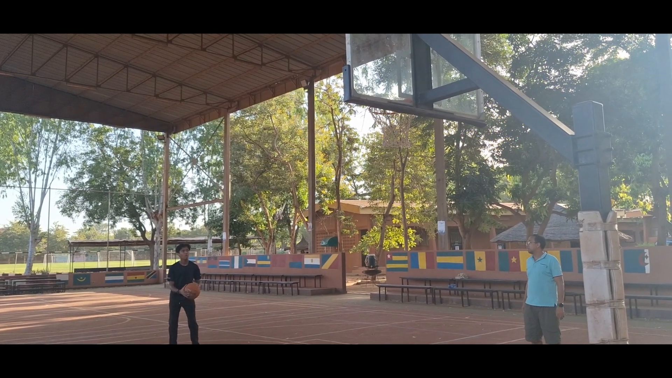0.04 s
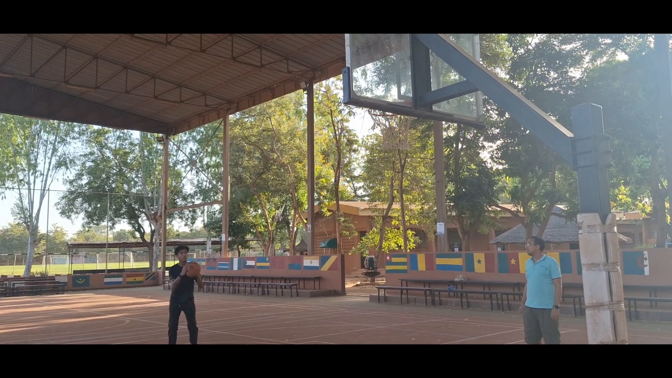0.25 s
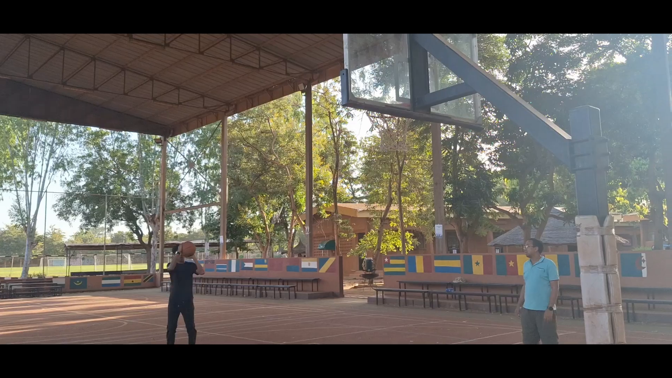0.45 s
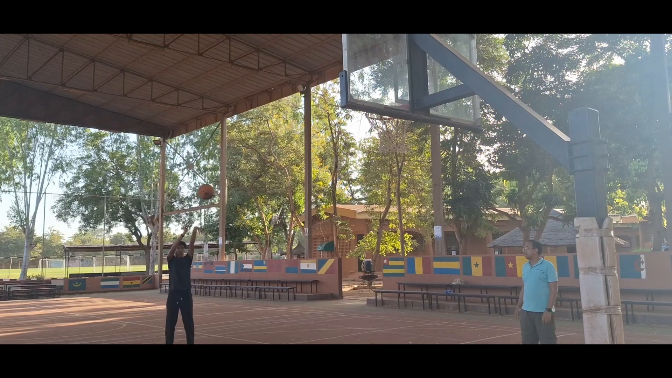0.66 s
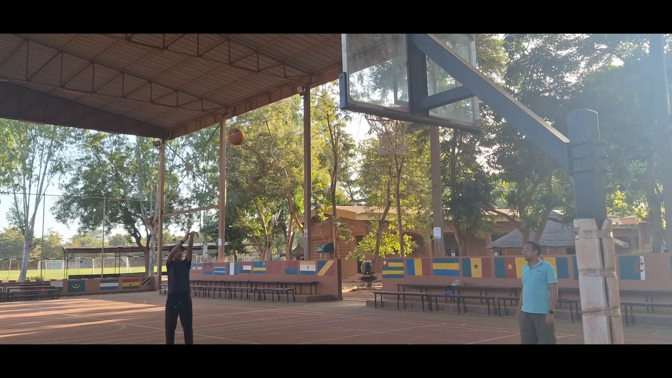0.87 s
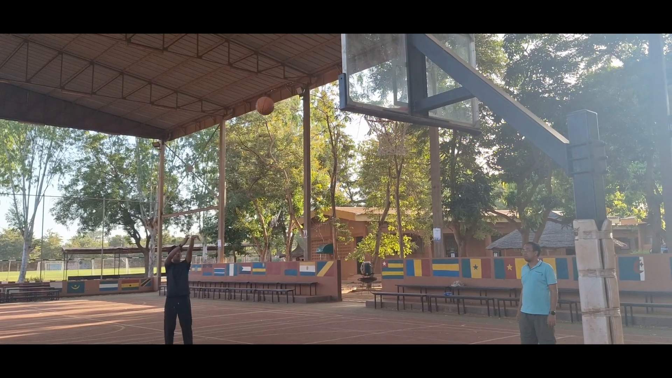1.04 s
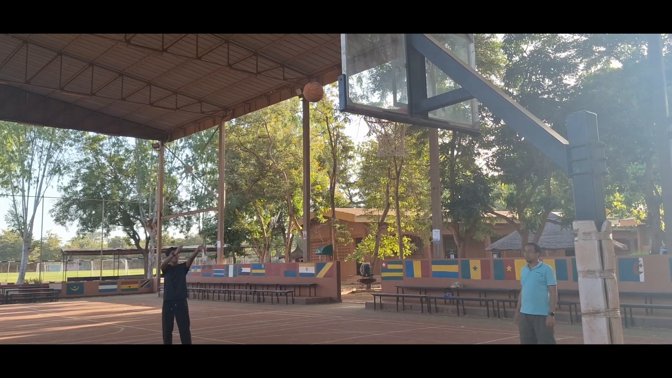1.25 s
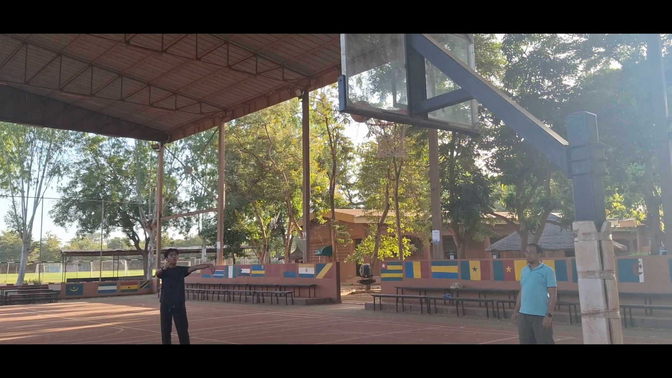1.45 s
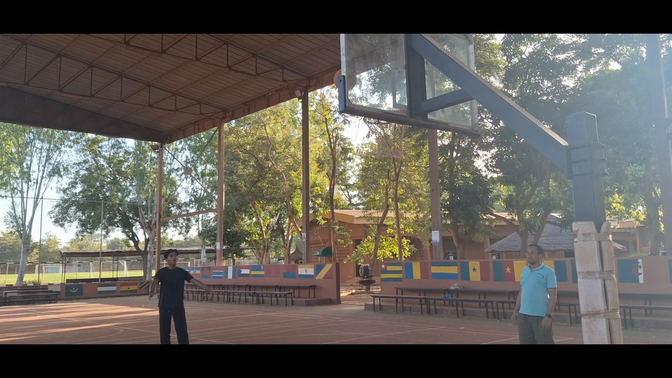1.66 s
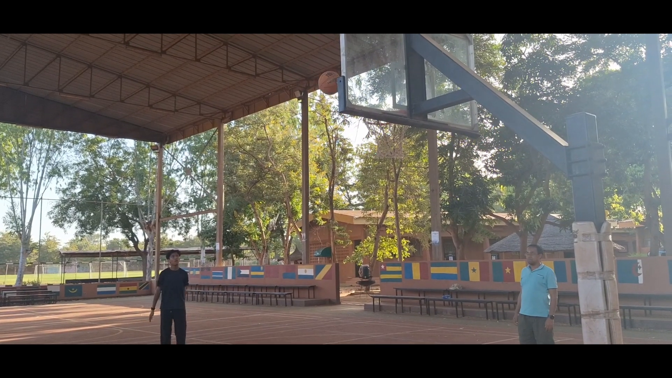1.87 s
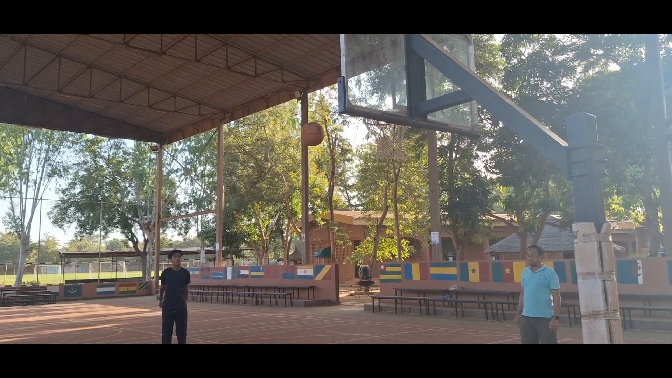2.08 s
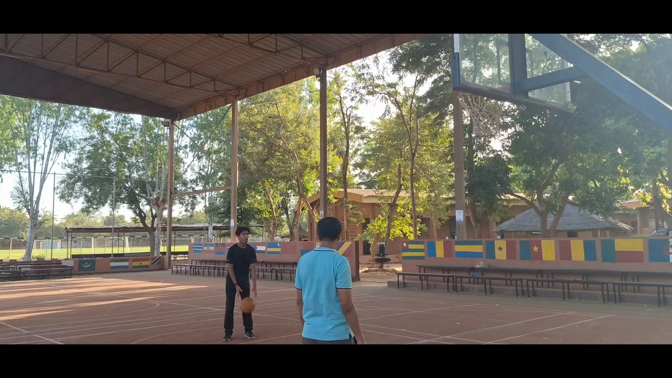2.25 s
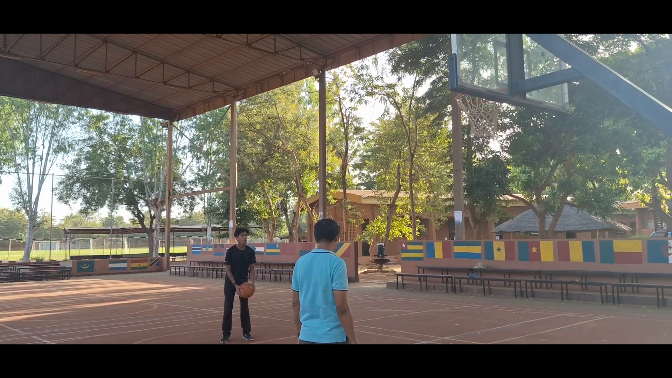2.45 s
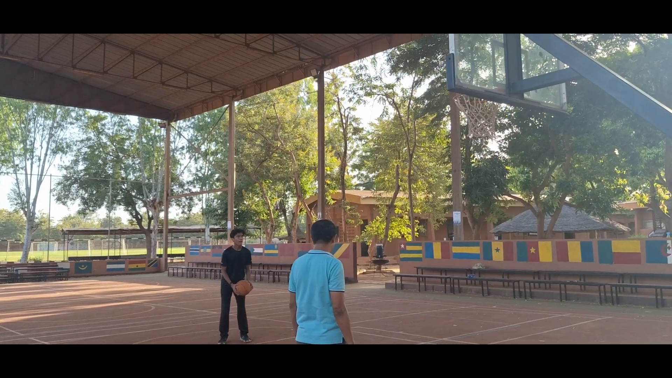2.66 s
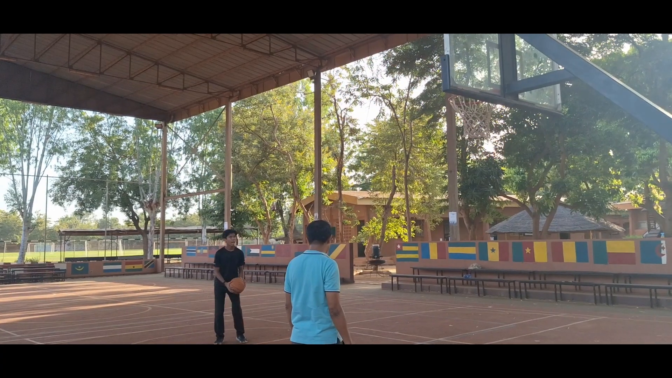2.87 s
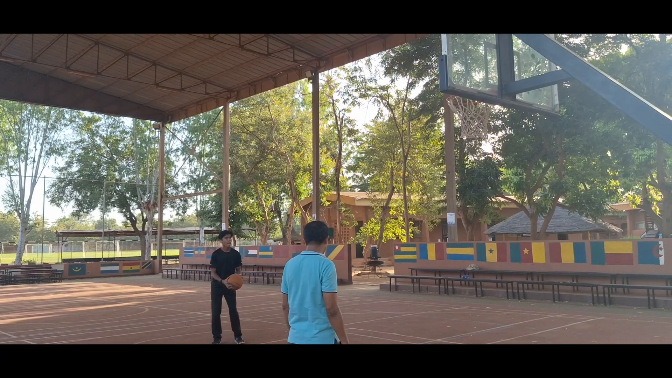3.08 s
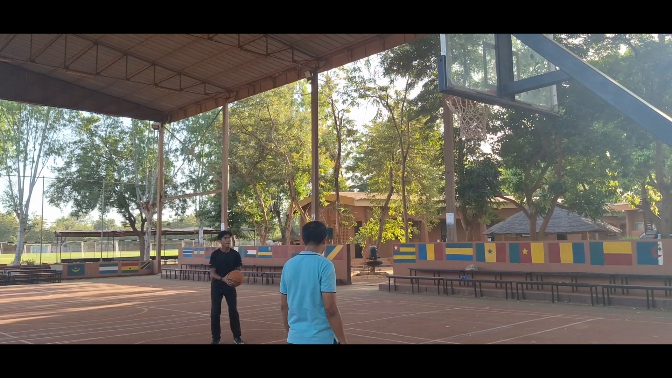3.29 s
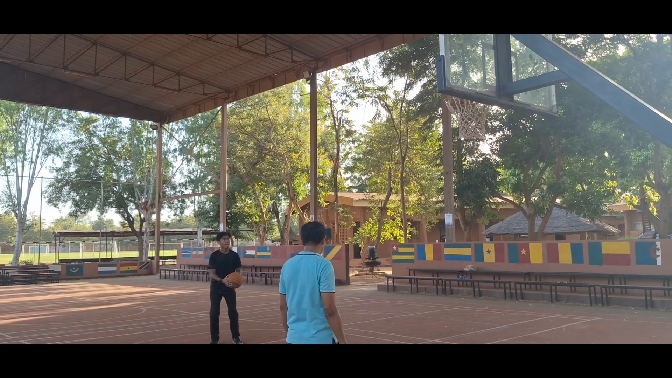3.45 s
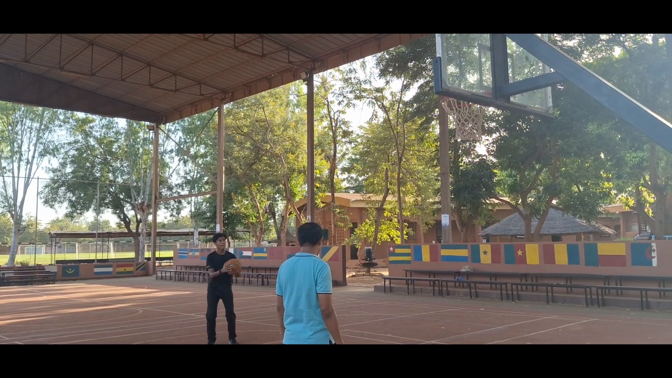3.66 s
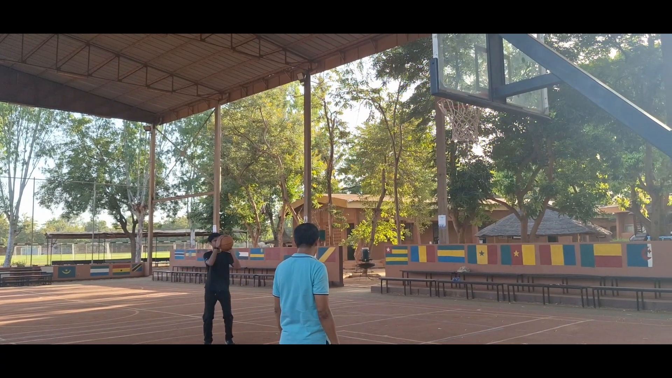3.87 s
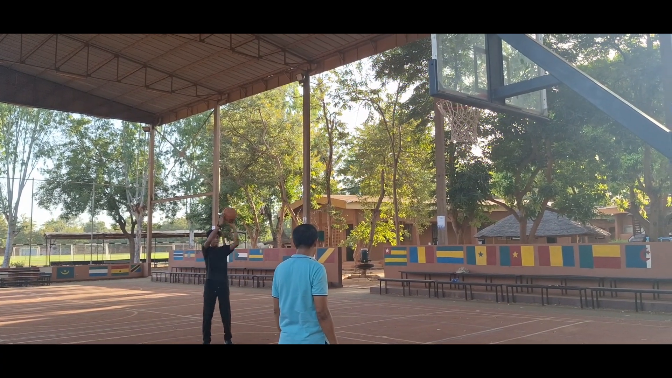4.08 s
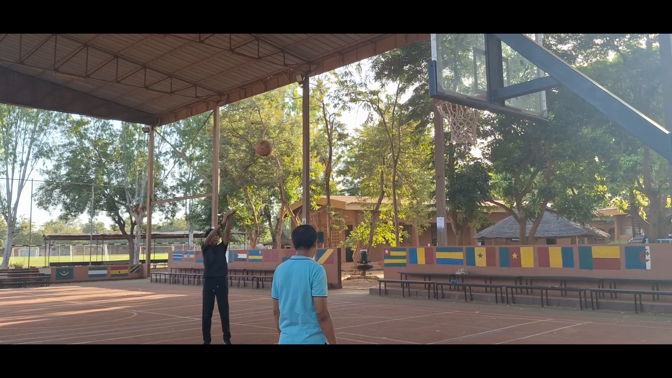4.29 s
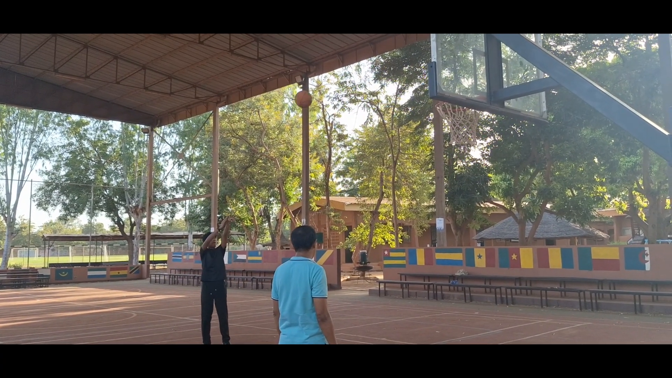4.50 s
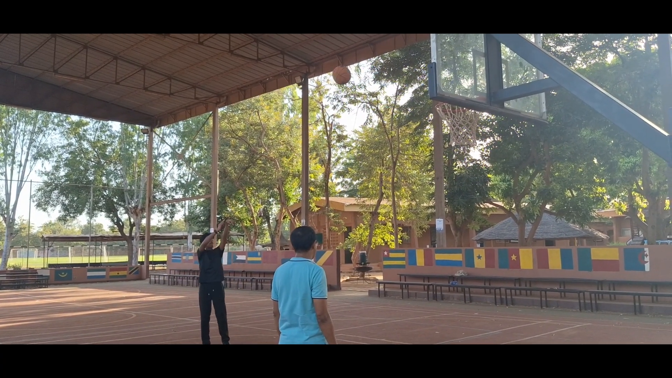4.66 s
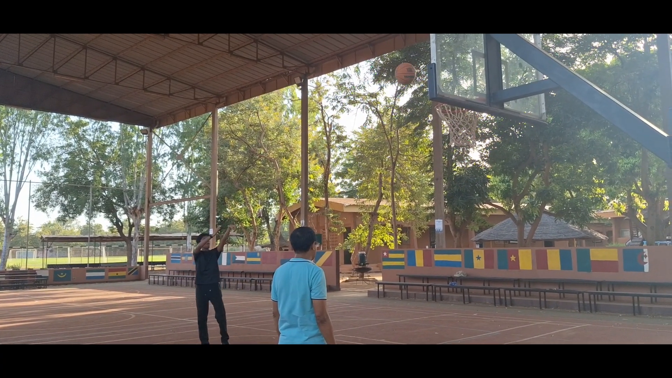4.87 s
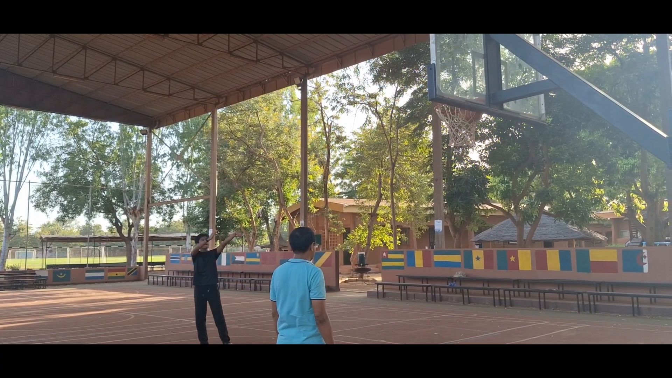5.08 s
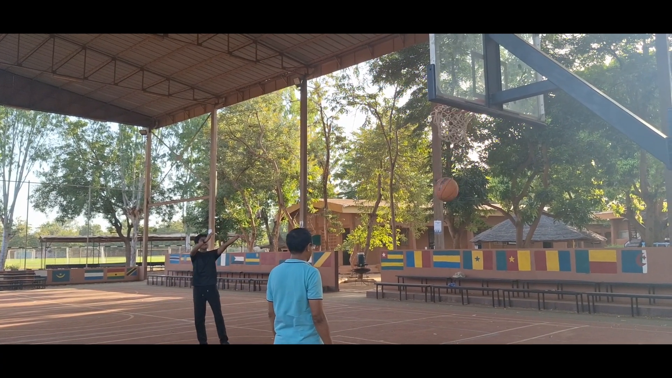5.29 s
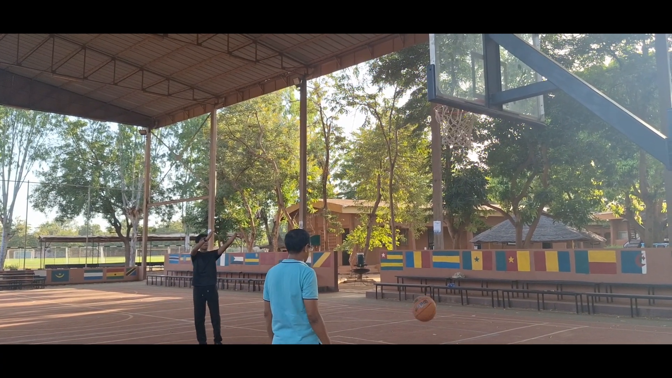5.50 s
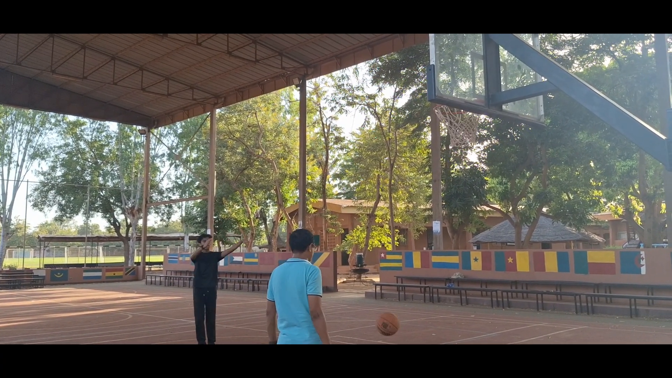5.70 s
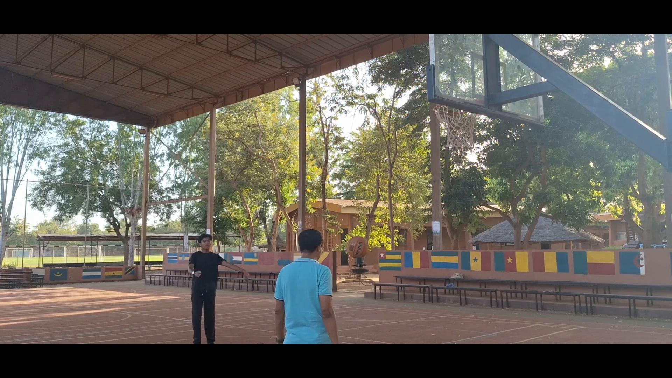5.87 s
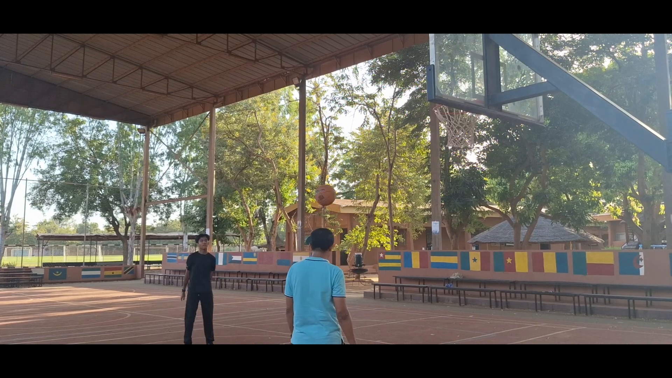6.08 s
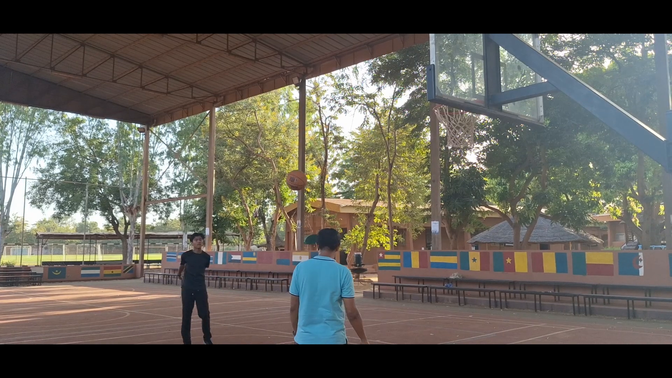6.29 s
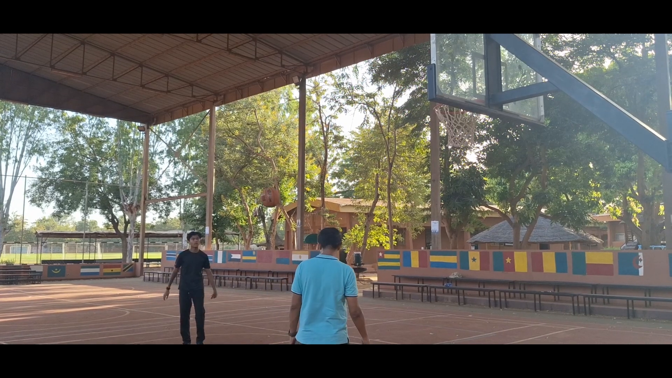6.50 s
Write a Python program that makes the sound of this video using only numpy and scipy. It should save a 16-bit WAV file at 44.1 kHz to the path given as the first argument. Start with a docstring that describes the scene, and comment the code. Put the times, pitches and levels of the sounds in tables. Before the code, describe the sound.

A roofed, open-sided basketball court, heard through a stereo phone. Distant traffic rumbles steadily under a soft leaf hiss that thins towards the end; a far engine hums low in surges near 0.2, 2.4, 3.9 and 4.8 seconds. A faint high brake squeal sags from about 0.3 to 1 second, with a tiny bird chirp. At 1.5 the ball knocks dully on the loose backboard: a quick rattle and a clangy hoop ring that fades over a second, with net rustle around 1.7. At 2.2 the ball hits concrete, a loud rubbery slap and short thump, fluttering roof echoes and light grit. A quiet gap follows, with a barely audible insect buzz and a bird at 4.6. At 5.1 a gentle knock and soft net swish, then at 5.65 a sharper, louder bounce, echoing, with faint grit and last thin chirps near 6.15.

```python
"""Basketball practice under a metal roof

A shot rattles the backboard and rings the hoop, the ball bounces once on concrete, then a second shot swishes
through the net and lands. Echoes flutter between floor and high roof. Knocks and rings are fading sine tones;
rattles, net and scuffs are bursts of tiny clicks; brake, birds, engine and insect are wavering tones; far
traffic and leaves are filtered noise."""
import sys
import numpy as np
from scipy import signal
from scipy.fft import rfft, irfft, next_fast_len
from scipy.io import wavfile

SR = 44100
rng = np.random.default_rng(int(sys.argv[2]) if len(sys.argv) > 2 else 0)


def transcribe(u):
    """Save the signal u as a 16-bit wav file named by the first command-line argument.

    u: samples, shape (n,) or (channels, n), limited to [-1, 1]; the rate is SR.
    q: integer samples, one column per channel.
    """
    v = np.clip(np.atleast_2d(u).T, -1, 1)
    q = np.round(v * 32767).astype(np.int16)
    wavfile.write(sys.argv[1], SR, q)


N = 288414  # length of the scene in samples

# ball on the floor: (time [s], thump level [dB], thump cutoff [Hz], slap level [dB],
# second snap against the first [dB], slap cutoff [Hz], reverberation send [dB])
FLOOR_BOUNCES = [(2.2147, -7, 300, 3.5, -5, 8400, -5.5), (5.653, -4.5, 800, 10.5, -6.5, 12000, -7.5)]
# tones of the ball's shell and enclosed air: (frequency [Hz], relative level [dB], time to fall 60 dB [s])
BALL_TONES = [(113.3, 1.5, 0.066), (238, -5, 0.051), (419, -18.5, 0.067), (736, -8.5, 0.028),
              (946, -23.5, 0.11), (1160, -18, 0.13), (1560, -20, 0.067), (2060, -12, 0.049)]
# colour of rubber slapping concrete: (frequency [Hz], relative level [dB])
SLAP_COLOUR = [(100, 13.5), (400, -21), (950, 11), (1450, 1.5), (2200, -2), (2800, -0.5), (3700, -12.5),
               (5000, -24), (6000, -25.5), (7200, -19), (9000, -43), (15000, -33)]
# early reflections from nearby surfaces: (delay [s], level [dB])
NEAR_ECHOES = [(0.0103, -7), (0.024, -15.5), (0.039, -7.5), (.056, -13)]
# ball knocking on board and hoop: (time [s], level [dB], cutoff [Hz])
BALL_KNOCKS = [(1.506, -22.5, 900), (1.521, -20, 900), (5.123, -22, 1800)]
# ball against the loose backboard: (time [s], level [dB], rise [s], time to fall 60 dB [s])
BOARD_BLOWS = [(1.499, -28, 0.0012, 0.028), (1.507, -21, 0.0087, 0.46), (1.530, -12.5, 0.015, 0.36),
               (1.605, -30, .006, 0.22), (1.68, -54, 0.0091, 1)]
# colour of the chattering board and fittings: (frequency [Hz], relative level [dB])
BOARD_COLOUR = [(40, -47), (200, -2.5), (320, -8.5), (470, -3.5), (850, -1.5), (1250, -3.5), (2400, -0.5),
                (3200, -7.5), (4500, -15.5), (8000, -19.5), (9000, -27.5), (15000, -27)]
# tones of hoop, board and steel frame: (frequency [Hz], level [dB], time to fall 60 dB [s])
HOOP_TONES = [(54, -35, 2.2), (190, -24, .45), (251, -38, 2.2), (502, -38, 2.1), (636, -34, 1.7),
              (676, -27, .5), (708, -29, .45), (798, -26, .5), (820, -26, .9), (848, -21.5, 1.4),
              (921, -25, .45), (949, -29, .5), (1046, -32, .85), (1570, -16, .46), (1784, -23, .55),
              (2022, -23, .32), (2191, -20, .37), (2264, -19, .3), (2346, -23, .37), (2633, -25, .42),
              (3184, -29, .36), (5512, -35, .33)]
# net cords shaken or dragged by the ball: (time [s], level [dB])
NET_SWISHES = [(1.675, -30), (1.75, -30.5), (5.115, -30), (5.152, -31.5), (5.215, -33.5)]
# colour of the net: (frequency [Hz], relative level [dB])
NET_COLOUR = [(100, -16), (300, -2), (490, 1), (750, -5), (1050, 0), (1900, -9), (2650, -10), (3600, -23),
              (5400, -18), (6600, -30.5), (7950, -22.5), (8800, -34), (15000, -34.5)]
# light scuffs after a bounce, of grit on the concrete or, near 2.35 s, of hands catching the ball: (time [s],
# level [dB], time to fall 60 dB [s])
SCUFFS = [(2.235, -27.5, 0.18), (2.345, -35.5, .17), (2.368, -32, 0.11), (5.738, -37.5, .4)]
# colour of the scuffs: (frequency [Hz], relative level [dB])
SCUFF_COLOUR = [(300, 19), (1500, 5), (4000, -6), (7500, -12), (10000, -24), (15000, -16)]
# bird calls: (time [s], length [s], pitch [Hz], glide [Hz per s], waver [Hz], level [dB])
BIRD_CALLS = [(.707, .12, 7600, 0, 250, -70), (1.977, .185, 9640, -1600, 190, -66.5),
              (4.63, 0.091, 7950, -4000, 150, -68), (6.134, .032, 5870, 0, 40, -70),
              (6.182, .085, 5860, 0, 40, -72)]
# a far engine pulls in surges: (time [s], length [s], exhaust note [Hz], level [dB])
ENGINE_SURGES = [(.2, 0.63, 145, -38), (2.4, 1.08, 151, -44.5), (3.85, 1.11, 153.6, -38.5),
                 (4.8, .85, 149.6, -40.5)]
# colour of distant traffic and leaves: (frequency [Hz], relative level [dB])
TOWN_COLOUR = [(35, 1.5), (90, -1.5), (125, -3.5), (165, -5.5), (250, -14), (350, -14.5), (420, -22),
               (650, -19), (1300, -23), (2000, -23.5), (3400, -34.5), (7900, -44), (8900, -50),
               (15500, -61.5)]
# rise and fall of the hiss, in three stretches; only changes around its mean count: (time [s], level [dB])
HISS_LEVEL = [
    [(0.0, -54), (0.468, -57), (1.45, -55)],
    [(2.5, -52.5), (4.01, -54.5), (5.05, -56.5)],
    [(6.0, -58), (6.182, -62.5), (6.54, -62)],
]
# likeness of the two microphones in diffuse sound: (frequency [Hz], correlation [-1 to 1])
MIC_LIKENESS = [(60, 0.98), (150, 0.95), (300, 0.88), (640, 0.55), (1300, -0.19), (3000, 0.057),
                (15000, -0.2)]
# difference in microphone sensitivity: (frequency [Hz], left minus right [dB])
MIC_DIFFERENCE = [(60, 3.5), (200, 1), (700, 1), (1300, -1.5), (2400, -2), (4400, 3.5), (8000, -0.5),
                  (15000, -0.5)]
# reverberation under the roof: (frequency [Hz], time to fall 60 dB [s])
ROOF_DECAY = [(90, 1.16), (250, 0.78), (500, 2.16), (1500, 1.05), (3500, 0.73), (7000, 0.68), (14000, 0.37)]

# flutter between floor and roof: first return, then one weaker echo per round trip
ROOF_DELAY_S, ROOF_DB, TRIP_S, TRIP_LOSS_DB = 0.0495, -11, 0.065, 3
SWISH_RISE_S, SWISH_T60_S, SCUFF_RISE_S = 0.012, 0.31, 0.011
# far brake squeal: it swells, holds and fades while its pitch sags
SQUEAL_S, SQUEAL_ATTACK_S, SQUEAL_HOLD_S, SQUEAL_T60_S = 0.28, 0.1, 0.2, 1.45
SQUEAL_HZ, SAG_HZ_PER_S, SQUEAL_DB = 3515, 100, -49
SQUEAL_LENGTH_S, SQUEAL_RAMP_S = 0.75, 0.03
SURGE_RAMP_S = 0.24
# an insect buzzing in the trees
INSECT_S, INSECT_LENGTH_S, INSECT_RAMP_S, INSECT_HZ, INSECT_DB = 2.24, 3.4, 0.36, 9900, -82.5
TOWN_DB = -35.5
TOP_HZ = 15800  # upper limit of the microphones


def bounces(hall, second_s=0.0005, second_hz=6500, scatter_db=-10, scatter_t60=0.042,
            mirror_hz=700, spray_db=-6, spray_t60=0.053, boom_db=-6):
    """Rubber slaps the floor, the ball squashes and rings, and stand and roof answer."""
    out = np.zeros((2, N))
    for s, thump_db, soft_hz, slap_db, second_db, edge_hz, wet_db in FLOOR_BOUNCES:
        thump = amp(thump_db) * ball(soft_hz)
        # a second, duller snap follows at once as the shell flattens
        snap = np.zeros(len(thump))
        add(snap, 0, -click(SLAP_COLOUR))
        add(snap, second_s, -amp(second_db) * dull(click(SLAP_COLOUR), second_hz))
        slap = amp(slap_db) * dull(unit(snap), edge_hz, order=6) / np.sqrt(len(snap))
        near_scatter = amp(scatter_db) * through(slap, scatter(scatter_t60))
        add(out, s, slap + thump + near_scatter)
        add(out, s, amp(wet_db) * through(slap + amp(boom_db) * thump, hall))
        # steps and trusses mirror the long waves and break up the short ones
        for delay, db in NEAR_ECHOES + flutter(count=5):
            mirrored = dull(thump, mirror_hz)
            broken_up = amp(spray_db) * through(slap, scatter(spray_t60))
            add(out, s + delay, amp(db) * (mirrored + broken_up))
    return out


def ball(edge_hz):
    """The ball rings in fading tones; a gentler contact, with a lower cutoff, wakes fewer high ones."""
    t = np.arange(2 ** 16) / SR
    body = np.zeros(len(t))
    for k, (hz, db, t60) in enumerate(BALL_TONES):
        sign = (-1) ** k
        body += sign * amp(db) * np.sin(2 * np.pi * hz * t) * decay(t, t60)
    return dull(body, edge_hz, order=1)


def scatter(t60):
    """Many small nearby surfaces answer with a brief noise spray of energy 1, different on each side."""
    t = np.arange(2 ** 12) / SR
    spray = rng.standard_normal((2, len(t))) * decay(t, t60)
    return unit(spray) / np.sqrt(len(t))


def flutter(count):
    """Sound bouncing between floor and roof returns at even steps: (delay [s], level [dB])."""
    return [(ROOF_DELAY_S + k * TRIP_S, ROOF_DB - k * TRIP_LOSS_DB) for k in range(count)]


def knocks():
    """The ball itself thuds dully where it meets board and hoop."""
    out = np.zeros((2, N))
    for s, db, edge_hz in BALL_KNOCKS:
        add(out, s, amp(db) * ball(edge_hz))
    return out


def backboard(hall, wet_db=-10, swell_s=0.022, pan_db=-1, rock_rad=0.24):
    """The board rattles in its fittings; the hardest blow sets hoop and frame ringing."""
    rattle = chatter(BOARD_BLOWS, BOARD_COLOUR, rate=6000, spread_db=1.5, common=0.4)
    out = rattle + amp(wet_db) * through(rattle, hall)
    hardest_s = max(BOARD_BLOWS, key=lambda blow: blow[1])[0]
    t = np.arange(2 * SR) / SR
    for hz, db, t60 in HOOP_TONES:
        # the less alike the microphones are at this pitch, the further out of step
        apart = np.arccos(at(MIC_LIKENESS, hz))
        phase = 2 * np.pi * rng.random() - np.array([[0], [apart]])
        # the frame rocks in its mounts, so each tone wavers a little
        phase = phase + rock_rad * walk(32, len(t))
        ring = (1 - np.exp(-t / swell_s)) * decay(t, t60)
        add(out, hardest_s, amp(db) * ring * np.sin(2 * np.pi * hz * t + phase))
    # half the left-minus-right difference goes to each side
    return out * amp(np.array([[pan_db], [-pan_db]]) / 2)


def chatter(events, colour, rate, spread_db, common=0):
    """Many tiny contacts per second build up and die away; a common share of power reaches both sides."""
    power, t = np.zeros(N), np.arange(SR) / SR
    for s, db, rise, t60 in events:
        burst = np.minimum(t / rise, 1) * decay(np.maximum(t - rise, 0), t60)
        add(power, s, (amp(db) * burst) ** 2)
    sizes = rng.standard_normal((3, N)) * amp(spread_db * rng.standard_normal((3, N)))
    happens = rng.random((3, N)) < rate / SR
    contacts = unit(sizes * happens) * np.sqrt(power)
    spread = np.sqrt(1 - common) * diffuse(contacts[:2])
    shared = np.sqrt(common) * contacts[2]
    return through(spread + shared, click(colour))


def brushes(hall, wet_db=-9):
    """Net cords rub over the ball, and grit and catching hands scuff, each as a burst of tiny contacts."""
    swishes = [(s, db, SWISH_RISE_S, SWISH_T60_S) for s, db in NET_SWISHES]
    scuffs = [(s, db, SCUFF_RISE_S, t60) for s, db, t60 in SCUFFS]
    cords = chatter(swishes, NET_COLOUR, rate=2200, spread_db=1)
    scuffing = chatter(scuffs, SCUFF_COLOUR, rate=5200, spread_db=3)
    return cords + scuffing + amp(wet_db) * through(cords + scuffing, hall)


def brake(hall, waver_hz=28, flutter_db=3.5, octave_db=-12, direct_db=-3, wet_db=-7):
    """A fluttering squeal with its octave, sinking a little as it dies away."""
    t = np.arange(N) / SR - SQUEAL_S
    fading = np.maximum(t - SQUEAL_ATTACK_S - SQUEAL_HOLD_S, 0)
    swell = np.clip(t / SQUEAL_ATTACK_S, 0, 1) * decay(fading, SQUEAL_T60_S)
    phase = turning(SQUEAL_HZ - SAG_HZ_PER_S * t + waver_hz * walk(197.8, N))
    tone = unit(np.sin(phase) + amp(octave_db) * np.sin(2 * phase))
    level = amp(SQUEAL_DB + flutter_db * walk(95.3, N))
    squeal = gate(t, SQUEAL_LENGTH_S, SQUEAL_RAMP_S) * swell * level * tone
    return amp(direct_db) * squeal + amp(wet_db) * through(squeal, hall)


def birds(hall, wet_db=-10):
    """Birds in the trees give thin calls of one wavering tone, some of them falling in pitch."""
    out = np.zeros((2, N))
    for s, length, pitch_hz, glide, waver_hz, call_db in BIRD_CALLS:
        t = np.arange(int(length * SR)) / SR
        note = np.sin(turning(pitch_hz + glide * t + waver_hz * walk(1500, len(t))))
        add(out, s, amp(call_db) * unit(note * signal.windows.tukey(len(t), 0.5)))
    return out + amp(wet_db) * through(out, hall)


def engine(wander_hz=2, throb_db=2.9):
    """A far exhaust note rises out of the traffic with each surge and sinks back."""
    out = np.zeros(N)
    for s, length, hz, db in ENGINE_SURGES:
        t = np.arange(int(length * SR)) / SR
        note = unit(np.sin(turning(hz + wander_hz * walk(23.8, len(t)))))
        level = amp(db + throb_db * walk(11.4, len(t)))
        add(out, s, gate(t, length, SURGE_RAMP_S) * level * note)
    return out


def insect(waver_hz=170):
    """An insect gives a faint, narrow, very high buzz: one tone whose pitch wavers quickly."""
    t = np.arange(N) / SR - INSECT_S
    buzz = unit(np.sin(turning(INSECT_HZ + waver_hz * walk(900, N))))
    return amp(INSECT_DB) * gate(t, INSECT_LENGTH_S, INSECT_RAMP_S) * buzz


def town(split_hz=900, lowest_hz=37, throb_db=1.36, flicker_db=1.04, leaves_db=-1.52, follow=0.13):
    """Traffic rumbles; leaves hiss as the breeze comes and goes, and the rumble follows a little."""
    hiss_s, hiss_db = np.transpose(np.concatenate(HISS_LEVEL))
    hiss_db = np.interp(np.arange(N) / SR, hiss_s, hiss_db)
    breeze_db = hiss_db - np.mean(hiss_db)
    air = through(diffuse(rng.standard_normal((2, N))), click(TOWN_COLOUR))
    no_deep_bass = signal.butter(8, lowest_hz, "high", fs=SR, output="sos")
    air = amp(TOWN_DB) * unit(signal.sosfilt(no_deep_bass, air))
    low = signal.sosfiltfilt(signal.butter(2, split_hz, fs=SR, output="sos"), air)
    rumble = low * amp(follow * breeze_db + throb_db * walk(11, N))
    leaves = (air - low) * amp(leaves_db + breeze_db + flicker_db * walk(7, N))
    return rumble + leaves


def roof(build_s=0.017, flutter_depth=0.16):
    """Reverberation of energy 1 that pulses with each trip between floor and roof."""
    t = np.arange(2 ** 16) / SR
    noise = rfft(diffuse(rng.standard_normal((2, len(t)))))
    hz = np.arange(noise.shape[1]) * SR / len(t)
    tail = 0
    for centre_hz, t60 in ROOF_DECAY:
        # each band peaks at its own frequency and blends into its neighbours
        band = at([(f, float(f == centre_hz)) for f, _ in ROOF_DECAY], hz)
        tail = tail + irfft(noise * band) * decay(t, t60)
    trips = 1 + flutter_depth * np.cos(2 * np.pi * (t - ROOF_DELAY_S) / TRIP_S)
    tail = tail * trips * (1 - np.exp(-t / build_s))
    return unit(tail) / np.sqrt(len(t))


def diffuse(pair):
    """Mix two unrelated signals into sound from all around: alike in the bass, much less so higher up."""
    n = next_fast_len(pair.shape[-1], True)
    mid, side = rfft(pair, n)
    likeness = at(MIC_LIKENESS, np.arange(len(mid)) * SR / n)
    mid = mid * np.sqrt((1 + likeness) / 2)
    side = side * np.sqrt((1 - likeness) / 2)
    return irfft(np.array([mid + side, mid - side]), n)[:, :pair.shape[-1]]


def amp(db):
    """Decibels to gain."""
    return 10 ** (np.asarray(db) / 20)


def unit(x):
    """Scale to an average (rms) level of 1."""
    return x / np.sqrt(np.mean(x ** 2))


def decay(t, t60):
    """Fade that falls by 60 dB in t60 seconds."""
    return np.exp(-np.log(1000) * t / t60)


def turning(hz):
    """Phase of a tone whose pitch may change at every sample."""
    return 2 * np.pi * np.cumsum(hz) / SR


def gate(t, length, ramp):
    """Fade in, hold, fade out."""
    return np.clip(np.minimum(t, length - t) / ramp, 0, 1)


def walk(rate, n):
    """Smooth random wandering with a spread near 1, heading for a new value rate times a second."""
    place = np.arange(n) / SR * rate
    return np.interp(place, np.arange(2 ** 13), rng.standard_normal(2 ** 13)) * np.sqrt(3 / 2)


def at(points, hz):
    """Read a spectrum on a log-frequency axis."""
    f, value = np.transpose(points)
    return np.interp(np.log(np.maximum(hz, 1)), np.log(f), value)


def add(out, s, x):
    """Mix x in from time s."""
    i = int(round(s * SR))
    out[..., i:i + x.shape[-1]] += x[..., :N - i]


def dull(x, hz, order=2):
    """Low-pass filter: soften everything above hz."""
    return signal.sosfilt(signal.butter(order, hz, fs=SR, output="sos"), x)


def through(x, response):
    """Convolve: every sample of x sets off the response; keep the length of x."""
    full = signal.fftconvolve(np.atleast_2d(x), np.atleast_2d(response), axes=-1)
    return full[:, :x.shape[-1]]


def causal(points, size=2048):
    """Minimum-phase response, its energy as early as possible, with the given (Hz, dB) colour."""
    hz = np.arange(size // 2 + 1) * SR / size
    cepstrum = irfft(np.log(amp(at(points, hz))))
    # fold the backward half of the cepstrum onto the forward half
    cepstrum[1:size // 2] *= 2
    cepstrum[size // 2 + 1:] = 0
    return irfft(np.exp(rfft(cepstrum)))


def click(points):
    """A coloured click of energy 1."""
    h = causal(points)
    return h / np.sqrt(np.sum(h ** 2))


def scene():
    """Play and surroundings sound together; ball play, brake and birds share the roof's reverberation."""
    hall = roof()
    play = bounces(hall) + knocks() + backboard(hall) + brushes(hall)
    return play + brake(hall) + birds(hall) + insect() + engine() + town()


def record(dry):
    """Each microphone has its own colour; the phone cuts the deepest bass, the highest peaks and the top."""
    ports = np.array([causal([(hz, side * db / 2) for hz, db in MIC_DIFFERENCE]) for side in (1, -1)])
    bass_cut = signal.butter(2, 28, "high", fs=SR, output="sos")
    top_cut = signal.ellip(10, 0.2, 70, TOP_HZ, fs=SR, output="sos")
    heard = signal.sosfilt(bass_cut, through(dry, ports))
    return signal.sosfilt(top_cut, np.clip(heard, -1, 1))


dry = scene()
out = record(dry)
transcribe(out)
```